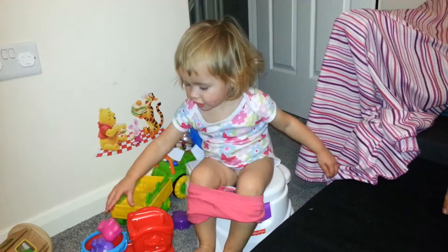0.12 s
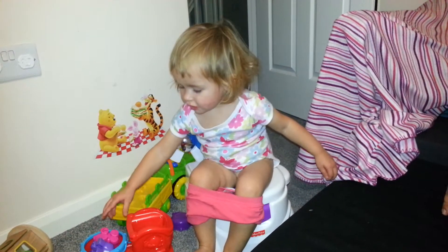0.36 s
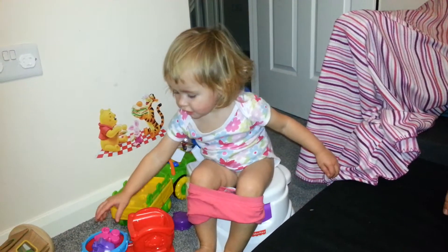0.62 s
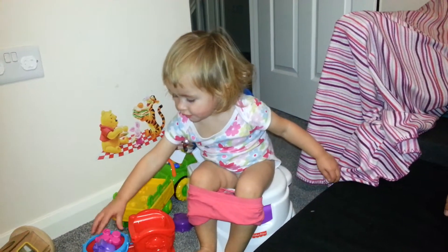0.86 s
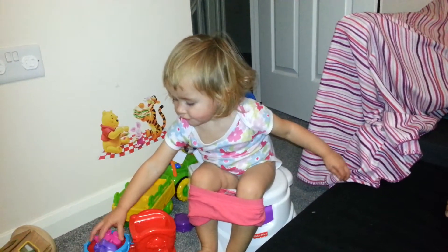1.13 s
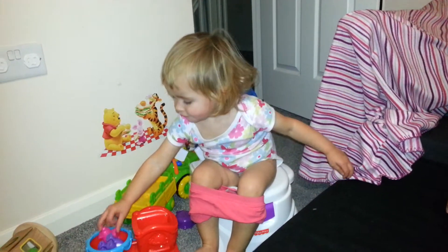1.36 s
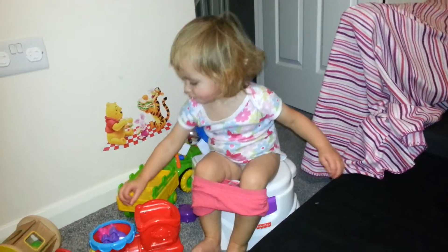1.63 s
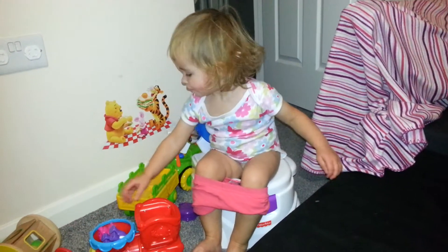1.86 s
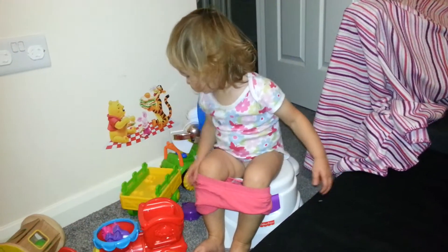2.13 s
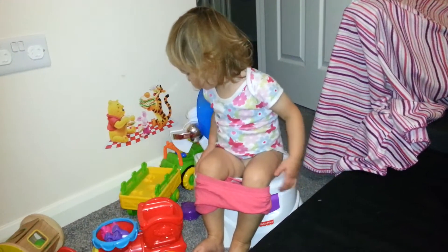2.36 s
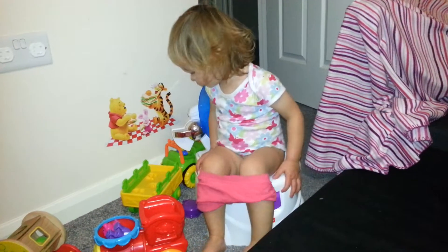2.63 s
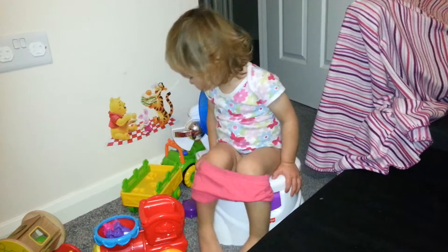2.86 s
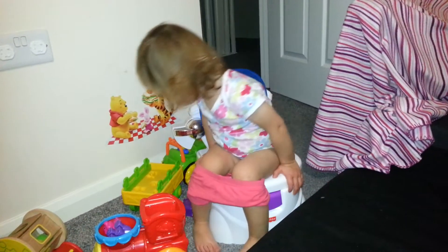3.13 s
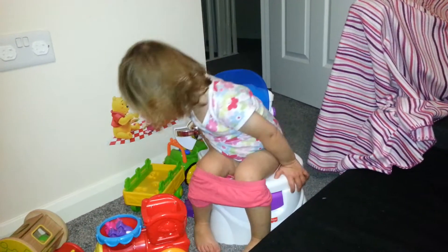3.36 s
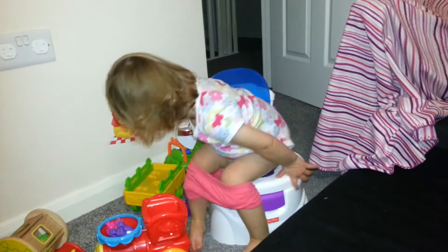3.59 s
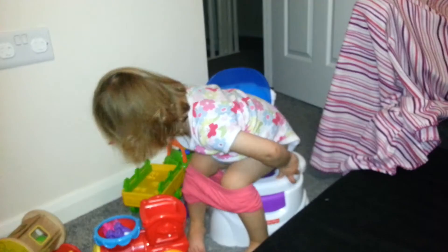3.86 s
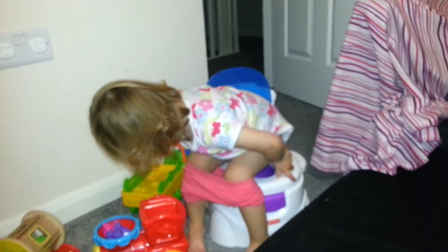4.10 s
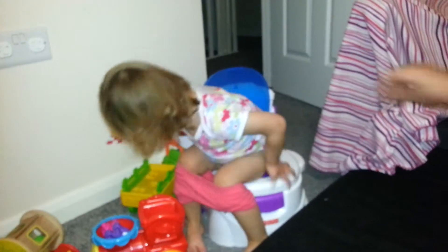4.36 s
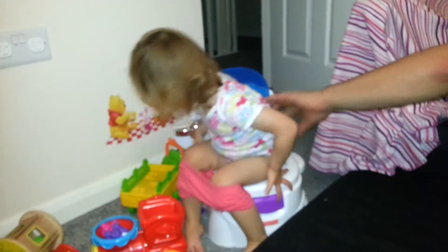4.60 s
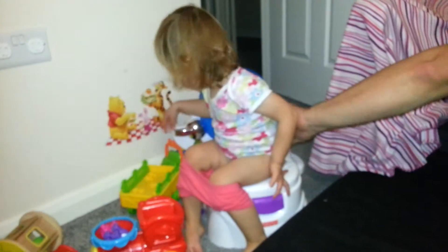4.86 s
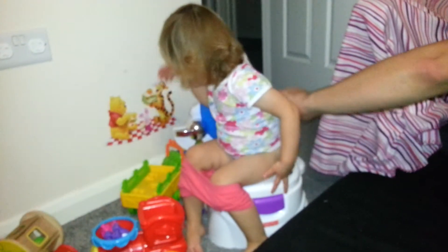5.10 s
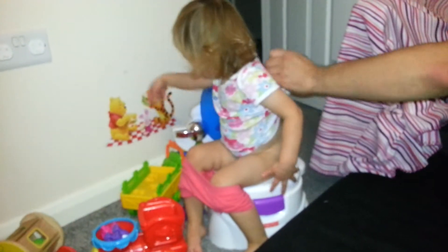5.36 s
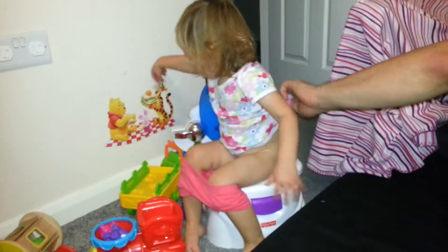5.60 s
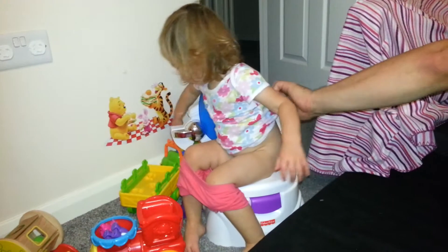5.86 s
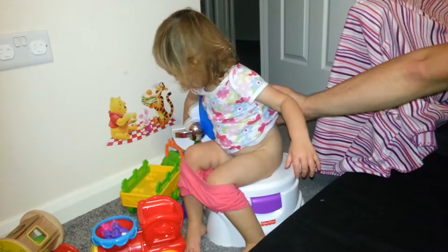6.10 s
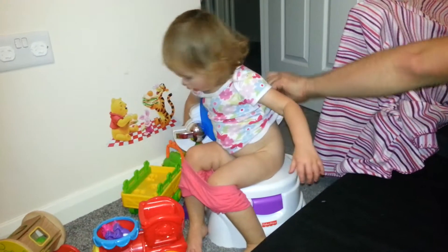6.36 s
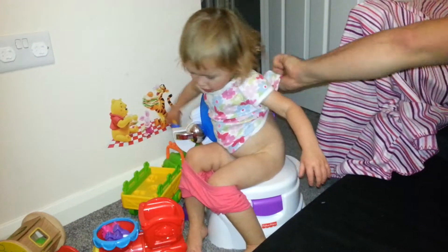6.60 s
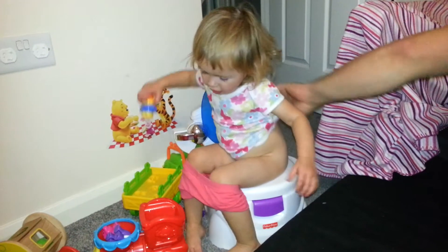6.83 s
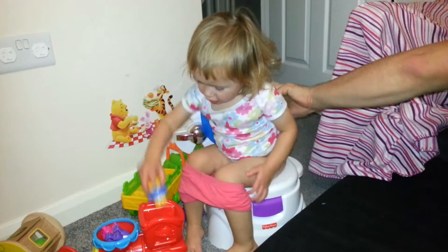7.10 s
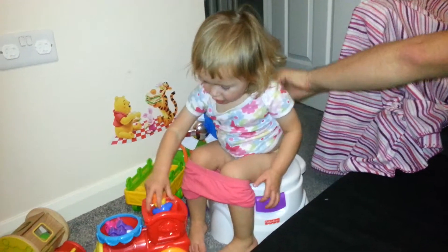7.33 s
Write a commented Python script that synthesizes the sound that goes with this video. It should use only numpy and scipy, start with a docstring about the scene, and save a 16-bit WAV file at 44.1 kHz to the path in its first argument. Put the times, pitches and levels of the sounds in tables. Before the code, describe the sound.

Hard plastic pieces knock together in a dense, loud burst, fall quiet, then rattle again a little less loudly. A long near-silent stretch holds faint scuffs and hollow creaks from a plastic seat. One distinct clack interrupts it, then tiny taps and a thin wavering squeak, and finally a quick clattering drop. Recorded indoors on a two-microphone phone, slightly off-centre, with short room reflections and low hiss.

```python
"""Plastic toys clattering in a room

Small hollow plastic toys knock, tumble, rattle and squeak, a little to the right of a two-microphone phone.
Knocks and pings are sums of decaying sines; rattle and seat creaks are random ticks through damped modes;
drags are wavering sines. Room echoes are decaying noise tails. Hiss and a faint hum lie beneath and duck
after loud clatter; the bass thins out while the sound is loud.
"""
import sys
import numpy as np
from scipy import signal
from scipy.fft import rfft, irfft, next_fast_len
from scipy.io import wavfile
from scipy.ndimage import map_coordinates

SR = 44100
rng = np.random.default_rng(int(sys.argv[2]) if len(sys.argv) > 2 else 0)


def linear_from_db(decibels):
    """Turn decibels (scalar or array-like) into linear amplitude factors; 0 gives 1."""
    return 10 ** (np.asarray(decibels, float) / 20)


def persist_wave(psi):
    """Save psi, clipped to +-1, as 16-bit WAV."""
    counts = np.round(np.clip(psi, -1, 1) * 32767).astype(np.int16)
    wavfile.write(sys.argv[1], SR, np.atleast_2d(counts).T)


N = 329427

# hiss spectrum: f/Hz, relative density/dB
HISS_SPECTRUM = [(7.1, -44), (12, -18.5), (27, -30), (173, -11.5), (255, -13), (297, -7.5), (412, -11),
                 (627, -8), (729, -13.5), (1210, -14.5), (1330, -10), (1450, -14.5), (5760, -25.5),
                 (13700, -21.5), (15500, -39.5)]
# left-right likeness of the hiss: f/Hz, likeness/1
HISS_ALIKE = [(100, 0.12), (300, 0.19), (640, 0.033), (1400, 0), (3000, 0.9), (7000, 0)]
# wavering hum tones before ducking: f/Hz, rms level/dB, waver bandwidth/Hz
HUM_TONES = [(630, -69, 8), (1300, -76.5, 14)]
# contacts: t/s, peak level/dB, loudest note f/Hz, snap/dB, crack/dB (upper bands re peak, before offsets)
CONTACTS = [(0.021, 0, 1058, -19.5, -24), (0.047, -6.5, 1027, -42, -33), (0.068, -1, 1836, -22, -30.5),
            (0.071, -4.5, 1400, -18.5, -28), (0.091, -3, 1049, -16, -26), (0.126, -13, 1020, -28.5, -41.5),
            (0.146, -10, 1012, -19, -24), (0.174, -5.5, 1455, -19.5, -31.5),
            (0.179, -10.5, 1900, -27, -32.5), (0.199, -22.5, 1438, -23.5, -29),
            (0.272, -13.5, 966, -10, -24), (0.277, -14, 1000, -22, -26), (0.299, -4.5, 1560, -17, -21.5),
            (0.302, -5, 1000, -18, -25), (0.311, -10.5, 1300, -19.5, -23.5),
            (0.319, -15.5, 1092, -19, -27.5), (0.332, -11, 970, -21, -34), (0.374, -18.5, 877, -17.5, -23),
            (0.392, -22, 916, -19.5, -29.5), (0.412, -26.5, 996, -26, -32), (0.42, -23.5, 990, -26, -32),
            (1.093, -26.5, 1050, -19.5, -32), (1.155, -23.5, 1050, -16, -28.5),
            (1.215, -15.5, 1117, -14, -33), (1.223, -12, 950, -17.5, -30), (1.27, -3.5, 993, -11.5, -19.5),
            (1.273, -11, 1500, -22, -26), (1.28, -6, 1055, -27, -33.5), (1.295, -19, 870, -19.5, -27),
            (1.328, -21.5, 1090, -29, -30.5), (1.35, -14, 1110, -30, -36), (1.359, -14, 940, -21, -35),
            (1.38, -14.5, 1050, -32, -21), (1.402, -17.5, 1010, -25.5, -24.5), (1.43, -20, 1090, -23, -31),
            (1.477, -21, 1093, -19, -27), (1.516, -17, 1040, -24.5, -38.5), (1.547, -21, 1050, -30, -39),
            (1.579, -18, 1083, -16, -26.5), (1.597, -12.5, 1034, -14, -25), (1.617, -31.5, 970, -12, -24.5),
            (2.099, -42, 440, -24.5, -27), (2.141, -43, 1270, -14, -18), (2.266, -21.5, 1940, -16.5, -15.5),
            (2.278, -29.5, 1550, -7, -25.5), (2.528, -39.5, 437, -19.5, -18.5), (2.704, -55, 906, -8, -27),
            (3.005, -45.5, 895, -17, -30), (3.097, -52, 597, -24, -28), (3.151, -45.5, 806, -16, -22),
            (3.314, -53, 600, -24, -28), (3.364, -47, 730, -27, -24), (3.414, -46, 700, -25, -21),
            (3.598, -45, 816, -22, -26), (3.613, -41.5, 910, -23, -27), (3.681, -48, 1200, -23, -28),
            (3.73, -48, 1280, -20, -23), (4.568, -44.5, 1820, -8, -24), (4.639, -43.5, 1500, -17, -24),
            (4.67, -44, 1720, -20, -24), (4.721, -40, 1640, -25, -24.5), (4.746, -15, 1245, -6.5, -14),
            (4.754, -18, 1860, -42, -22), (4.779, -29, 1720, -19, -25), (4.794, -23, 540, -17.5, -56),
            (4.812, -22, 700, -46, -38), (4.824, -29.5, 710, -28.5, -34), (5.189, -40.5, 1950, -15, -36),
            (5.24, -40, 1350, -10, -27), (5.369, -40.5, 1530, -14, -33), (5.49, -35.5, 1390, -21, -41),
            (5.968, -30.5, 1370, -9, -30), (6.206, -32.5, 2350, -14, -31), (6.244, -36.5, 1540, -12.5, -25),
            (6.338, -27.5, 1560, -13, -22.5), (6.359, -19.5, 2042, -14.5, -22),
            (6.37, -31.5, 910, -25, -21), (6.399, -34, 850, -14, -16), (6.929, -39.5, 1300, -20.5, -41),
            (7.247, -14.5, 1652, -12.5, -24), (7.255, -8, 1370, -19.5, -18), (7.26, -10.5, 1000, -12, -16),
            (7.269, -12.5, 947, -13, -17), (7.285, -16, 956, -8.5, -11), (7.299, -17, 833, -7, -16),
            (7.318, -21.5, 1010, -10, -30.5), (7.331, -18.5, 1050, -18, -26.5),
            (7.362, -10, 1534, -18.5, -31), (7.367, -14.5, 1003, -19, -26.5),
            (7.428, -20, 981, -20.5, -31.5), (7.452, -26.5, 1500, -18.5, -33)]
# toy shell modes before contact damping: f/Hz, relative level/dB, t60/s
SHELL_MODES = [(234, -6, 0.052), (313, -5, 0.034), (444, -4.5, 0.085), (526, 1.5, 0.23), (701, 3.5, 0.12),
               (884, 2, 0.12), (994, 5.5, 0.1), (1076, 4.5, 0.042), (1248, 4, 0.054), (1500, -1, 0.059),
               (1560, -2, 0.081), (1807, -2.5, 0.046), (1998, -2.5, 0.037), (2354, -7, 0.085),
               (2758, 1.5, 0.027), (3020, 11, 0.013), (3550, -2, 0.11), (3734, 12, 0.011),
               (4250, 1.5, 0.071), (4600, 0, 0.017), (5218, -2.5, 0.01), (5800, -15.5, .025),
               (7480, 5, 0.026), (8640, 5, 0.027), (10500, -5, 0.007)]
# hands shifting the toys: start t/s, length/s, level/dB
HAND_MOVES = [(1.054, 0.29, -55.5), (1.293, 0.12, -47.5), (1.66, .25, -66), (2.118, 0.17, -70),
              (2.28, .14, -71), (2.532, 0.09, -62), (2.902, 0.24, -68.5), (3.31, 0.24, -69.5),
              (3.582, 0.11, -68.5), (4.551, 0.16, -65.5), (4.849, 0.29, -66), (5.151, .28, -63),
              (5.451, 0.088, -63.5), (5.939, 0.088, -59), (6.076, 0.1, -62), (6.198, 0.2, -58.5),
              (6.36, .14, -69), (6.88, 0.087, -70), (7.377, .2, -68.5)]
# room decay: f/Hz, t60/s
ROOM_DECAY = [(250, 0.36), (1000, 0.27), (4000, 0.21), (12000, 0.17)]
# left-right likeness of the echoes: f/Hz, likeness/1
ECHO_ALIKE = [(300, 1), (900, 0.48), (2000, 0.44), (5000, 0.77)]
# hard little parts ringing on: t/s, initial level of the lower mode/dB, its f/Hz, t60/s
PART_RINGS = [(0.069, -17.5, 2380, 0.036), (0.09, -16, 4250, 0.038), (.3, -27, 3550, 0.14),
              (1.066, -49, 2244, 0.056), (1.578, -21.5, 3530, 0.028), (7.255, -7.5, 4600, 0.022),
              (7.266, -35, 4600, 0.091), (7.281, -28, 3250, 0.14), (7.319, -29, 4600, 0.069),
              (7.365, -20, 1560, 0.057), (5.162, -53, 1950, .05)]
# seat flexing under shifting weight: peak t/s, level/dB, rise/s, fall/s (both over 26 dB)
SEAT_LOADS = [(2.104, -56.5, 0.036, 0.15), (2.284, -54, 0.14, 0.16), (2.534, -63, 0.048, 1),
              (3.156, -52, 0.23, 0.055), (3.428, -55, 0.25, 0.1), (3.618, -60.5, 0.062, 0.16),
              (4.68, -64.5, 1, 0.12)]
# hollow seat modes before damping: f/Hz, relative level/dB, t60/s
SEAT_MODES = [(224, -2.5, 0.059), (290, 0, 0.065), (420, 0, 0.098), (540, -3.5, 0.09), (855, -8.5, 0.022),
              (1390, -13, 0.022)]
# toy dragged over plastic: start t/s, length/s, level/dB
TOY_DRAGS = [(4.89, .2, -65), (5.34, .1, -65), (6.084, .27, -51.5)]
# direct sound, left over right: f/Hz, level/dB
LEFT_LEAN = [(60, -10.5), (150, -3.5), (380, -2), (950, 3.5), (2380, 2.5), (5980, -8), (15000, 4)]

HISS_DB, DUCK_DB, RECOVER_S = -58, -2.5, 0.63
DUCK_ABOVE_DB = -37  # clatter level at half the full duck
THUD_DB, THUD_GROWS_DB_PER_DB = -49, 0.099  # thud at full strength; it barely grows with the blow
NOTE_T60_S, CLACK_RISE_S, RING_RISE_S = .035, .0002, .001
SCATTER_RAD = .85  # spread of mode starting phases
HELD = .72  # touching neighbours shorten every knock mode to this share of its t60
SHAKEN_DB, SHAKEN_EDGE_DB, SETTLE_T60_S = -32.5, -2.5, 0.33  # re knock peak, edge re body, decay
HAND_EDGE_DB, SCUFF_DB, SCUFF_TOP_DB = 1.5, -2, -66.5  # edge and scuff re hand level, scuff ceiling
HAND_ATTACK_S, HAND_RELEASE_S = 0.029, 0.052
ECHO_GAIN_DB = -9
PING_SPLIT = 1.012  # upper over lower frequency of a ping pair
DRAG_HZ, DRAG_GRIP_HZ, DRAG_GRIP_S, DRAG_WAVER_HZ = 1520, -110, .04, 70  # pitch, start offset, rise, waver
LAG_SAMPLES = 5.4  # left microphone behind right
TOP_HZ = 15700


def unit(x):
    """Scales to rms 1."""
    return x / np.sqrt(np.mean(x ** 2) + 1e-20)


def along(points, hz):
    """Interpolates (f/Hz, value) points on a log frequency axis."""
    f, v = np.transpose(points)
    return np.interp(np.log(hz + 1), np.log(f + 1), v)


def filtered(x, response):
    """Applies a complex response of frequency."""
    m = next_fast_len(N + SR // 2)
    return irfft(rfft(x, m) * response(np.fft.rfftfreq(m, 1 / SR)), m)[..., :N]


def resonances(modes, widen):
    """Sums causal second-order modes of alternating sign; bandwidth is widen / t60."""
    def response(f):
        total = 0
        for k, (centre_hz, db, t60_s) in enumerate(modes):
            width_hz = widen / t60_s
            band = 1j * f * width_hz
            total = total + (-1) ** k * linear_from_db(db) * band / (centre_hz * centre_hz - f * f + band)
        return total
    return response


def ticks(rate_hz, spread_db):
    """Random tiny contacts of either sign and uneven strength."""
    hit = rng.random(N) < rate_hz / SR
    return hit * rng.choice([-1, 1], size=N) * linear_from_db(spread_db * rng.standard_normal(N))


def stroke(start_s, length_s, attack_s, release_s):
    """A gain that rises, holds and fades."""
    t = np.arange(N) / SR - start_s
    return np.clip(np.minimum(t / attack_s, 1 + (length_s - t) / release_s), 0, 1) ** 2


def wobble(rate_hz):
    """A smooth random curve with rate_hz knots a second."""
    knots = rng.standard_normal(int(N * rate_hz / SR) + 4)
    return map_coordinates(knots, [np.arange(N) * rate_hz / SR])


def paired(noises, spectrum, alike):
    """Colours two unrelated signals and mixes them to left and right of given likeness."""
    def response(hz):
        turn = np.arccos(np.clip(along(alike, hz), -1, 1)) / 2
        return linear_from_db(along(spectrum, hz)) * [np.cos(turn), np.sin(turn)]
    mid, side = filtered(noises, response)
    return np.array([mid + side, mid - side])


def hum():
    """Sines wavering in level and phase, alike in both microphones."""
    t = np.arange(N) / SR
    out = np.zeros(N)
    for hz, db, width_hz in HUM_TONES:
        level, phase = [0.16 * unit(filtered(rng.standard_normal(N), lambda f: 1 / (1 + (f / width_hz) ** 2)))
                        for _ in range(2)]
        out += linear_from_db(db) * unit((1 + level) * np.sin(2 * np.pi * hz * t + 1.4 * phase))
    return out


def floor(toys):
    """Room tone, hiss and hum; all duck with the smoothed power of the clatter."""
    recent = signal.lfilter([1 / (RECOVER_S * SR)], [1, 1 / (RECOVER_S * SR) - 1], toys ** 2)
    duck_db = DUCK_DB * recent / (recent + linear_from_db(DUCK_ABOVE_DB) ** 2)
    noise = unit(paired(rng.standard_normal((2, N)), HISS_SPECTRUM, HISS_ALIKE))
    hiss = linear_from_db(HISS_DB + 0.54 * wobble(6.8)) * noise
    return linear_from_db(duck_db) * (hiss + hum())


def knocks():
    """Each contact rings crowded, damped shell modes, loudest near its own note, with a dry clack."""
    out, t = np.zeros(N + SR), np.arange(SR // 9) / SR
    # thin walls split each mode into a cluster
    hz, mode_db, t60_s = np.repeat(SHELL_MODES, repeats=4, axis=0).T[:, :, None]
    bins_hz = np.fft.rfftfreq(len(t), 1 / SR)
    for s, db, note_hz, snap_db, crack_db in CONTACTS:
        thud_db = THUD_DB - (1 - THUD_GROWS_DB_PER_DB) * db
        detune, strength, phase = rng.standard_normal((3, len(hz), 1))
        colour = [(450, thud_db), (800, -23.5), (2000, -8.0), (2600, snap_db + 7.5), (4400, snap_db + 6.0),
                  (7000, crack_db - 3.5), (11000, crack_db - 2.0), (15000, crack_db - 11.5)]
        near_db = 9 * np.exp(-(np.log(hz / note_hz) / 0.18) ** 2)
        start_db = along(colour, hz) + mode_db + near_db + 1.7 * strength
        level = linear_from_db(start_db - 60 * t / (HELD * t60_s))
        sines = np.sin(2 * np.pi * hz * (1 + .05 * detune) * t + SCATTER_RAD * phase)
        ring = np.sum(level * sines, axis=0)
        note = linear_from_db(-6.5 - 60 * t / NOTE_T60_S) * np.sin(2 * np.pi * note_hz * t)
        burst = irfft(rfft(rng.standard_normal(len(t))) * linear_from_db(along(colour, bins_hz)), len(t))
        clack = linear_from_db(19.0 - 60 * t / 0.022) * burst * (1 - np.exp(-t / CLACK_RISE_S))
        blow = (ring + note) * (1 - np.exp(-t / RING_RISE_S)) + clack
        nominal_peak = 2.6 * np.std(blow[:SR // 120])  # over the first 8 ms
        out[round(s * SR):][:len(t)] += linear_from_db(db) * blow / nominal_peak
    return out[:N]


def rattle():
    """Dense small contacts ring damped shell modes: parts settle after knocks and rub when handled."""
    contacts = ticks(rate_hz=1200, spread_db=5.0)
    body = unit(filtered(contacts, resonances(SHELL_MODES[4:14], widen=13)))
    upper = resonances(SHELL_MODES[14:21], widen=16)
    edge = unit(filtered(contacts, lambda hz: upper(hz) / (1 + 1j * hz / 6000) ** 2))  # light contacts are dull
    scuff = unit(filtered(rng.standard_normal(N), lambda hz: 1j * hz / (3000 + 1j * hz)))

    kick_at = [round(k[0] * SR) for k in CONTACTS]
    kicks = np.bincount(kick_at, [linear_from_db(k[1] + SHAKEN_DB) for k in CONTACTS], N)
    shaken = signal.lfilter([1], [1, -linear_from_db(-60 / (SETTLE_T60_S * SR))], kicks)

    strokes = sum(linear_from_db(db) * stroke(s, length_s, HAND_ATTACK_S, HAND_RELEASE_S)
                  for s, length_s, db in HAND_MOVES)
    hand = strokes * linear_from_db(0.66 * wobble(25))
    airy = np.minimum(linear_from_db(SCUFF_DB) * hand, linear_from_db(SCUFF_TOP_DB)) * scuff
    edge_level = linear_from_db(SHAKEN_EDGE_DB) * shaken + linear_from_db(HAND_EDGE_DB) * hand
    return (shaken + hand) * body + edge_level * edge + airy


def room(x):
    """Noise-tail echoes, each frequency dying at its own speed; the tail is redrawn every 50 ms."""
    out, step = np.zeros((2, N + SR)), SR // 20
    for start in range(0, N, step):
        hz, t, z = signal.stft(rng.standard_normal((2, SR // 3)), SR, nperseg=256)
        decay = linear_from_db(-60 * t / along(ROOM_DECAY, hz)[:, None])
        tail = signal.istft(z * decay, SR, nperseg=256)[1]
        wet = signal.fftconvolve(x[None, start:start + step], tail / np.linalg.norm(tail[0]), axes=1)
        out[:, start + 180:][:, :wet.shape[1]] += wet  # first wall answers after 4 ms
    return paired(out[:, :N], [(1000, 1), (6000, 1.0)], ECHO_ALIKE)


def pings():
    """A close pair of modes beats as it dies."""
    out, t = np.zeros(N + SR), np.arange(SR // 5) / SR
    for s, db, hz, t60_s in PART_RINGS:
        pair = np.sin(2 * np.pi * hz * t) + 0.84 * np.sin(2 * np.pi * hz * PING_SPLIT * t)
        out[round(s * SR):][:len(t)] += linear_from_db(db - 60 * t / t60_s) * pair * (1 - np.exp(-t / 0.00054))
    return out[:N]


def seat():
    """Uneven slips knock and scuff the modes of the hollow seat."""
    t = np.arange(N) / SR
    load = sum(linear_from_db(db - 26.0 * np.maximum((s - t) / rise_s, (t - s) / fall_s))
               for s, db, rise_s, fall_s in SEAT_LOADS)
    slips = ticks(rate_hz=350, spread_db=5.5)
    return load * unit(filtered(slips, resonances(SEAT_MODES, widen=5.0)))


def drag():
    """A squeak: one wavering sine that starts flat and rises as the grip tightens."""
    t = np.arange(N) / SR
    loose = sum((t > s) * np.exp(-np.maximum(t - s, 0) / DRAG_GRIP_S) for s, _, _ in TOY_DRAGS)
    hz = DRAG_HZ + DRAG_GRIP_HZ * loose + DRAG_WAVER_HZ * wobble(200)
    swing = linear_from_db(2.2 * wobble(80))
    level = sum(linear_from_db(db) * stroke(s, length_s, 0.0048, 0.054) for s, length_s, db in TOY_DRAGS)
    return level * unit(swing * np.sin(2 * np.pi * np.cumsum(hz) / SR))


def scene():
    """Small toys radiate no bass; direct sound reaches the right microphone first."""
    sources = knocks() + pings() + rattle() + seat() + drag()
    toys = filtered(sources, lambda hz: (1j * hz / (90 + 1j * hz)) ** 6)
    side = np.array([[1], [-1]]) / 2  # left, right

    def to_microphones(hz):
        delay = np.exp(-2j * np.pi * hz * LAG_SAMPLES * side / SR)
        return linear_from_db(side * along(LEFT_LEAN, hz)) * delay

    direct = filtered(toys, to_microphones)
    return direct + linear_from_db(ECHO_GAIN_DB) * room(toys) + floor(toys)


def top_cut(x):
    """Nothing passes above the cut-off."""
    return signal.sosfilt(signal.butter(12, 15750, fs=SR, output="sos"), x)


def record(dry):
    """The bass thins out while the sound is loud; the top is cut and the converter clips."""
    power = signal.lfilter([1 / (0.025 * SR)], [1, 1 / (0.024 * SR) - 1], np.mean(dry ** 2, axis=0))
    bass = filtered(dry, lambda hz: 1 / (1 + (hz / 230) ** 8))
    bass_gain = (1 + power / linear_from_db(-44.0) ** 2) ** -.3
    mix = filtered(dry - bass * (1 - bass_gain), lambda hz: hz < TOP_HZ)
    return top_cut(np.clip(mix, -1, 1))


dry = scene()
out = record(dry)
persist_wave(out)
```